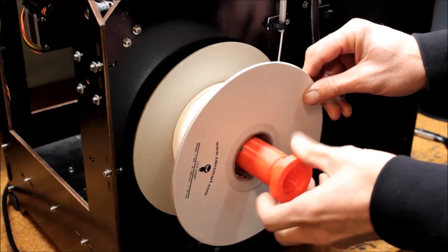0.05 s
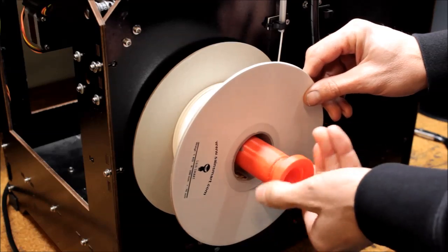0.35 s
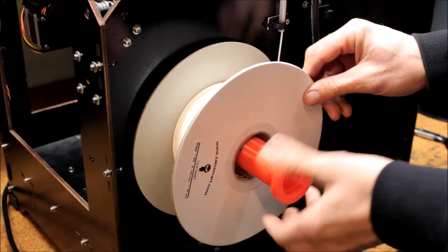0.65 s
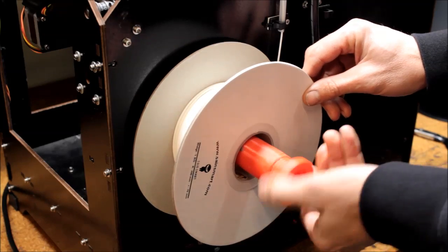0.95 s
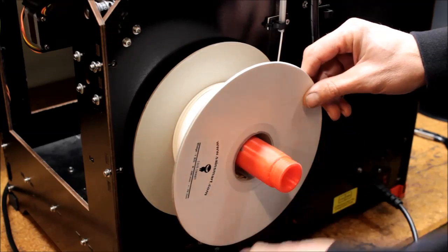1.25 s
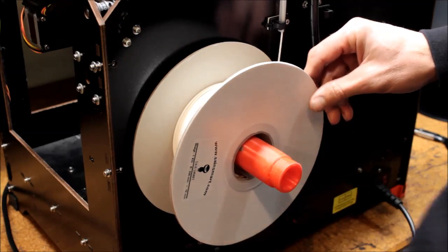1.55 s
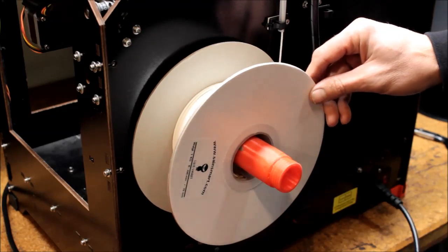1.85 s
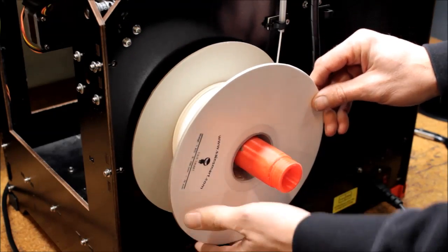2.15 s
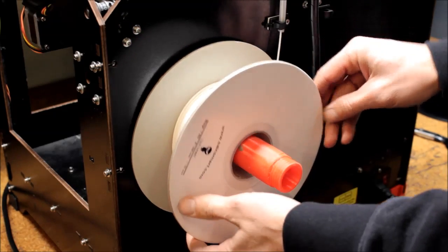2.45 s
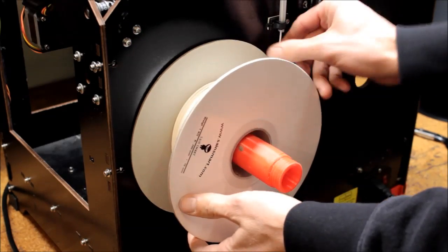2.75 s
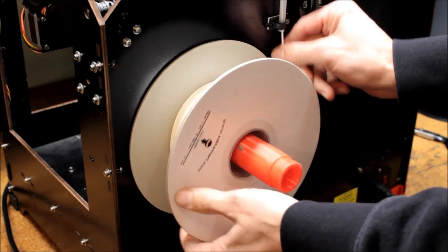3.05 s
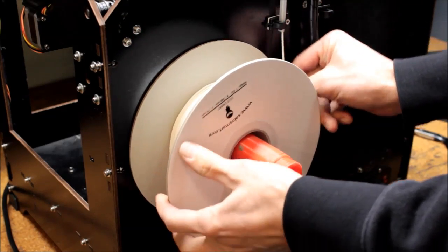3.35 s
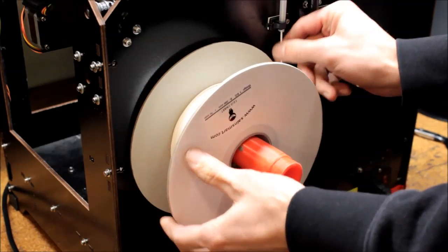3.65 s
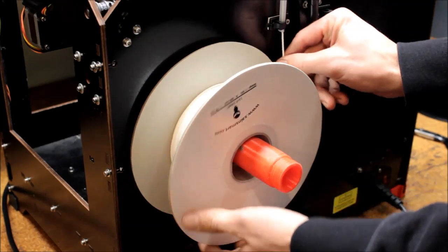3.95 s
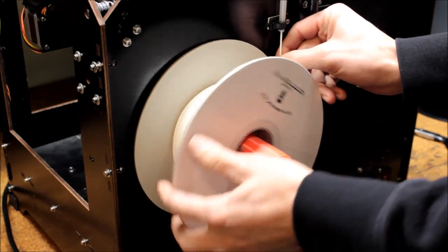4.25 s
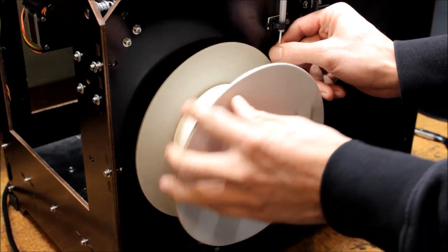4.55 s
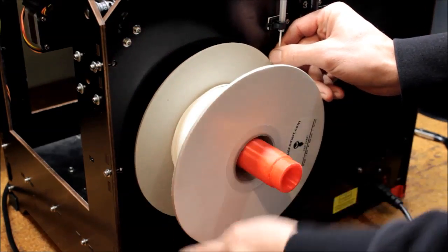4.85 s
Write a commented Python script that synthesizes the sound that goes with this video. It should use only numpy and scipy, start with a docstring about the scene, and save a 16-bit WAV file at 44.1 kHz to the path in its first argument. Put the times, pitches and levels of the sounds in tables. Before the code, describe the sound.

A plastic nut is spun off a spool's axle, knocking and chattering along the thread, then lands on a bench with a short clack. After a bright snap, the plastic spool is shifted and turned by hand, giving hollow knocks, soft rubbing and a few tiny squeaks. The microphone is close, in a small, quiet workshop.

```python
"""Handling a filament spool.

A small, quiet workshop, one microphone close to the bench. A plastic nut is spun off the spool's axle,
knocking and chattering on its thread, and is put down. The spool is shifted and turned by hand: its
flanges boom when it drops against the axle and its hub rubs. Now and then the plastic squeaks and
the taut filament ticks."""
import sys
import numpy as np
from scipy import signal
from scipy.fft import rfft, irfft
from scipy.io import wavfile
from scipy.ndimage import uniform_filter1d

SR = 44100
rng = np.random.default_rng(int(sys.argv[2]) if len(sys.argv) > 2 else 0)


def transcribe(signal):
    """Save signal, clipped to [-1, 1], as a 16-bit WAV file at the path in sys.argv[1]."""
    frames = np.atleast_2d(signal).T
    limited = np.clip(frames, -1, 1)
    pcm = np.round(limited * 32767).astype(np.int16)
    wavfile.write(sys.argv[1], SR, pcm)


N = 225330
TIME = np.arange(N) / SR
RING = 8192  # samples allowed for a body to ring out

# resonances of the spool: pitch_hz, level_db, t60_s
SPOOL_MODES = [(137.3, -15, 0.14), (179.6, -16, 0.3), (231, -18, 0.26), (292.3, -8, 0.11),
               (367.3, -14.5, 0.16), (434, -11.5, 0.076), (579, -15.5, 0.27), (630.7, -0.5, 0.1),
               (930, -9, 0.018), (912, -3.5, 0.055), (978, 9.5, 0.011), (1125, -27, 0.013),
               (1440, -4, 0.018), (1620, -6.5, 0.024), (2490, -29, 0.0092)]


def amp(db):
    """Decibels to gain."""
    return 10 ** (np.asarray(db) / 20)


def unit(x):
    """Scale to an energy of one."""
    return x / np.sqrt(np.sum(x ** 2) + 1e-18)


def level(x, db):
    """Scale to an rms of one, then apply a level or a level curve."""
    return x * amp(db) / np.std(x)


def fade(t, t60):
    """Exponential decay, 60 dB down at t60."""
    return np.exp(-np.log(1000) * t / t60)


def colour(x, points):
    """Minimum-phase filter through (frequency_hz, gain_db) points."""
    hz, db = np.transpose(points)
    bins_hz = np.maximum(np.arange(RING // 2 + 1) * SR / RING, 1)
    gain = amp(np.interp(np.log(bins_hz), np.log(hz), db))
    cepstrum = irfft(np.log(gain))
    cepstrum[1:RING // 2] *= 2
    cepstrum[RING // 2 + 1:] = 0
    response = irfft(np.exp(rfft(cepstrum)))[:RING // 2]
    return signal.oaconvolve(x, response)[:len(x)]


def body(modes, crowd, crowd_db, crowd_t60, treble_t60):
    """Response to one tap: clear modes over a dense crowd of short ones, whose treble dies first."""
    t = np.arange(RING) / SR
    tones = 0
    for k, (hz, db, t60) in enumerate(modes):
        gain = (-1) ** k * amp(db + rng.normal(0, 1))
        pitch_hz = hz * rng.normal(1, 0.0089)
        tones += gain * fade(t, t60) * np.sin(2 * np.pi * pitch_hz * t)
    low = colour(rng.standard_normal(RING), [(2500, 4.5), (8000, 2.4)]) * fade(t, crowd_t60)
    high = colour(rng.standard_normal(RING), [(2500, -13), (8000, 6.5)]) * fade(t, treble_t60)
    return unit(unit(tones) + amp(crowd_db) * unit(colour(low + high, crowd)))


def knocks(rows, modes, crowd, crowd_db, crowd_t60, treble_t60, chatter_db, click_db):
    """Each blow is one contact and a brief chatter of smaller ones, ringing a body."""
    # spectrum of the bare contact: frequency_hz, gain_db
    click_spectrum = [(800, -16), (3000, -1), (6000, 20), (15000, -7)]
    click = amp(click_db) * unit(colour(signal.unit_impulse(RING), click_spectrum))
    out, t = np.zeros(N + RING), np.arange(RING) / SR
    for start_s, db, bass_db, treble_db, chatter_s in rows:
        chatter = rng.standard_normal(RING) ** 3 * np.exp(-t / chatter_s)
        force = signal.unit_impulse(RING) + amp(chatter_db) * unit(chatter)
        response = click + body(modes, crowd, crowd_db, crowd_t60, treble_t60)
        ring = signal.fftconvolve(force, response)[:RING]
        # a soft, heavy contact favours the bass, a hard edge the treble
        ring = colour(ring, [(420, bass_db), (1100, 0.013), (5000, treble_db)])
        start = int(start_s * SR)
        out[start:start + RING] += unit(ring) * amp(db) * np.sqrt(SR / 100)  # energy of 10 ms at db
    return out[:N]


def motion(moves, rise_db_per_s, fall_db_per_s, sag_db_per_s=0):
    """Level curve in dB: each move builds up to its start, lasts, then dies away; the strongest wins."""
    curves = []
    for start_s, length_s, db in moves:
        t = TIME - start_s
        rise = rise_db_per_s * np.maximum(-t, 0)
        sag = sag_db_per_s * np.clip(t, 0, length_s)
        fall = fall_db_per_s * np.maximum(t - length_s, 0)
        curves.append(db - rise - sag - fall)
    return np.max(curves, axis=0)


def slips(per_s, spread_db):
    """Stick and slip: tiny contacts at random moments, their sizes scattered by spread_db."""
    happens = rng.random(N) < per_s / SR
    size = amp(spread_db * np.minimum(rng.exponential(size=N), 4))
    return happens * size * rng.choice([-1, 1], N)


def rub(force, response, db):
    """A train of contacts, following a level curve, rings a body."""
    return signal.oaconvolve(level(force, db), unit(response))[:N]


def walk(per_s):
    """Random values joined by straight lines."""
    count = int(per_s * N / SR) + 2
    return np.interp(TIME * per_s, np.arange(count), rng.standard_normal(count))


def shifting(x, depth_db, per_s):
    """The contact point moves, so each part of the spectrum swells and fades by itself."""
    out = 0
    for edge_hz in (500, 900, 1500, 2500, 4000, 6500, 10000):
        band = signal.sosfilt(signal.butter(1, edge_hz, fs=SR, output="sos"), x)
        out += band * amp(depth_db * walk(per_s))
        x = x - band
    return out + x * amp(depth_db * walk(per_s))


def room_air():
    """The workshop's steady air, a faint, low noise."""
    # spectrum of the air: frequency_hz, gain_db
    spectrum = [(20, 6.5), (32, -35), (46, 7.5), (62, -12), (90, -6), (150, -3), (220, -5), (430, -11),
                (750, -10.5), (1300, -15.5), (2100, -18), (4000, -22), (9000, -28), (15500, -29)]
    return level(colour(rng.standard_normal(N), spectrum), db=-60.47)


def nut_on_thread():
    """Flicked round by the fingers, the loose nut knocks, chatters and scrapes along the thread."""
    # flicks that spin the nut: start_s, length_s, level_db
    flicks = [(0, .004, -58.5), (0.215, 0.038, -45), (0.267, 0.009, -47.5), (.365, 0.12, -51),
              (.91, .065, -44), (1.017, 0.013, -45.5)]
    # knocks on the thread: start_s, level_db, bass_db, treble_db, chatter_s
    hits = [(.1165, -33.5, -12, -0.5, 0.0019), (.119, -28.5, -7.5, 0, 0.0029),
            (.1275, -32, -16, -20, 0.0016), (.174, -46, 8, -12, .0034), (.2035, -38.5, -7, -7, .013),
            (.2225, -39.5, 0, -2, 0.0043), (.412, -50, 6, 7, 0.0077), (.8215, -47.5, -11.5, -29, .001),
            (.8735, -42, -4, -27, .0013), (.8875, -33, -8, -11, 0.0028), (.894, -40, -10, -9, 0.0046),
            (.912, -42, 15, 5, .0036), (1.036, -43.5, 2, 7, 0.0029), (1.0415, -35, -22, -5.5, 0.0034),
            (1.049, -41, 6, 13, .0033)]
    # resonances of the nut on the axle: pitch_hz, level_db, t60_s
    modes = [(346, -5, 0.047), (421, -11, 0.2), (633, 1.5, 0.089), (672, -5.5, 0.15), (750, 0.5, 0.047),
             (930, -13.5, 0.16), (1180, -28, 0.15), (1347, 1.5, 0.032), (1554, -14.5, 0.11),
             (1922, -3, 0.056), (2016, -1.5, 0.049), (2230, -9, 0.051), (2720, -23, 0.076),
             (4240, -13, 0.022)]
    # spectrum of the short-lived modes between them: frequency_hz, gain_db
    crowd = [(90, -23.5), (220, -11.5), (330, -2), (680, -1), (2100, -9), (2700, -15.5), (5500, -24),
             (7500, -45), (15000, -48)]
    blows = knocks(hits, modes, crowd, crowd_db=-7, crowd_t60=0.05, treble_t60=0.02,
                   chatter_db=-7.5, click_db=-42)
    chatter_db = motion(flicks, rise_db_per_s=187, fall_db_per_s=147, sag_db_per_s=39)
    response = body(modes, crowd, crowd_db=-1, crowd_t60=0.026, treble_t60=0.025)
    response *= fade(np.arange(RING) / SR, t60=0.51)  # held against the thread, the nut is damped
    chatter = rub(slips(per_s=630, spread_db=-1.5), response, chatter_db)
    scrape_db = -58.5 + 0.85 * (chatter_db + 45)  # grows a little more slowly than the chatter
    scrape = colour(slips(per_s=5000, spread_db=2),
                    [(1800, -2), (3000, 2.5), (4500, 5.5), (6000, 0.5), (8000, -6), (15000, -15)])
    return blows + chatter + level(scrape, scrape_db)


def squeaks(waver=0.015):
    """For a moment the slipping locks onto one resonance and sings, slightly unsteadily."""
    # squeaks of plastic on plastic: start_s, pitch_hz, level_db, length_s
    notes = [(0.128, 1955, -33, 0.012), (1.04, 1980, -62, 0.0058), (4.168, 3440, -54, 0.021),
             (4.181, 2780, -55, 0.032), (4.24, 6030, -56, .012), (4.246, 3810, -55, 0.026)]
    out = np.zeros(N)
    for start_s, hz, db, length_s in notes:
        start, count = int(start_s * SR), int(length_s * SR)
        wobble = level(uniform_filter1d(rng.standard_normal(count), size=60), db=0)
        phase = 2 * np.pi * np.cumsum(hz * (1 + waver * wobble)) / SR
        out[start:start + count] += level(np.sin(phase) * np.hanning(count), db)
    return out


def filament():
    """Small bright ticks as the taut strand slips."""
    # ticks of the strand: start_s, level_db, bass_db, treble_db, chatter_s
    ticks = [(1.1765, -55.5, 0, -6, .002), (2.525, -51, 0, -32, 0.0032), (4.8712, -52.5, 0, 32, 0.00093)]
    # resonances of the strand: pitch_hz, level_db, t60_s
    modes = [(3840, 1.5, 0.041), (4090, 2.5, 0.029), (5000, -8, 0.085), (5450, -3, 0.019),
             (5960, -11, 0.065), (7030, -9.5, 0.062)]
    # spectrum of its short-lived modes: frequency_hz, gain_db
    crowd = [(300, -51), (2500, -10), (4500, -11), (7000, -34), (9000, 11), (15000, 31)]
    return knocks(ticks, modes, crowd, crowd_db=-20, crowd_t60=0.06, treble_t60=0.015,
                  chatter_db=-12, click_db=-16)


def nut_put_down():
    """The nut lands on the bench and rocks to rest."""
    # landing and bounces: start_s, level_db, bass_db, treble_db, chatter_s
    hits = [(1.615, -41.5, -16, 22, 0.0011), (1.6172, -30.5, -6.5, 5.5, 0.0028),
            (1.6198, -31, -8, 5, 0.0024), (1.642, -39.5, -2, 2, 0.0046), (1.655, -46.5, 2.5, 4, .0016),
            (1.735, -47, 3, 0, .0045)]
    # resonances of the nut on the bench: pitch_hz, level_db, t60_s
    modes = [(594, -4.5, 0.13), (742, -14, .09), (848, -5, 0.12), (975, -33, .14), (1262, 2, 0.062),
             (1344, 7.5, 0.051), (1560, -9, 0.079), (1687, -0.5, 0.056), (2090, -11, .11),
             (2700, -21, 0.12), (4070, -12, 0.025), (9540, -18, 0.026)]
    # spectrum of the short-lived modes between them: frequency_hz, gain_db
    crowd = [(100, -8), (450, 1), (800, 4.5), (1800, -0.5), (4000, -12), (7000, -26), (11000, -58),
             (15000, -43)]
    blows = knocks(hits, modes, crowd, crowd_db=-4.5, crowd_t60=0.099, treble_t60=0.011,
                   chatter_db=-3.5, click_db=-26.5)
    rocking = (1.64, 0.12, -48)  # start_s, length_s, level_db
    rocking_db = motion([rocking], rise_db_per_s=1200, fall_db_per_s=129, sag_db_per_s=19)
    response = body(modes, crowd, crowd_db=4.5, crowd_t60=0.054, treble_t60=0.015)
    # rolling contact is softer than a blow
    response = colour(response, [(300, -1.5), (1300, 2.5), (4000, 0.5), (9000, -7)])
    return blows + rub(slips(per_s=1100, spread_db=2), response, rocking_db)


def spool():
    """The spool knocks on its axle; turning, its hub rubs, its flanges rumble and the hand brushes them."""
    # knocks on the axle: start_s, level_db, bass_db, treble_db, chatter_s
    hits = [(2.0975, -45.5, -18, -7.5, .0013), (2.2085, -57.5, -20, -30, .0013),
            (2.530, -39.5, 15, -3, 0.0037), (2.575, -36, 3.5, -8, 0.01), (2.592, -42.5, 8, -15, 0.0053),
            (2.687, -52.5, 0, -6, 0.003), (2.7685, -40, 3, 0, 0.0011), (3.613, -47, -25, 12, 0.002),
            (3.6195, -31, -7.5, -1.5, 0.00038), (3.627, -35.5, 7, -1, 0.007), (3.655, -40, 10.5, 1, 0.015),
            (3.706, -47, 16, -23, .003), (3.712, -40, 15.5, -30, 0.0044), (4.152, -44, 7, 2, 0.0012),
            (4.336, -46.5, 4, 18, 0.0012), (4.598, -44, 21, 4, .0044), (4.608, -48, 5, 12.5, .01),
            (4.727, -47.5, 14.5, 0, .00065)]
    # spectrum of the spool's short-lived modes: frequency_hz, gain_db
    crowd = [(70, -29.5), (140, -7), (350, -5), (600, -2), (1000, 0), (2000, -7), (4000, -12), (6000, -25),
             (9000, -27.5), (15000, -34)]
    blows = knocks(hits, SPOOL_MODES, crowd, crowd_db=-0.5, crowd_t60=0.068, treble_t60=0.029,
                   chatter_db=-9, click_db=-21.5)

    # pushes that turn the spool at a steady speed: start_s, length_s, level_db
    pushes = [(1.958, 0.034, -59), (2.091, 0.012, -56.5), (2.338, 0.037, -57), (2.569, 0.005, -47),
              (2.838, .04, -62), (3.062, .06, -59.5), (3.137, .24, -54), (3.477, 0.016, -55.5),
              (3.745, 0.015, -54), (3.851, 0.045, -57.5), (4.093, .04, -56), (4.164, .035, -47),
              (4.25, 0.18, -53), (4.491, 0.036, -49.5), (4.593, 0.034, -49)]
    # spectrum of the hub's friction: frequency_hz, gain_db
    hub_spectrum = [(300, -19.5), (480, -9.5), (680, -6.5), (850, -6), (1050, 0), (1500, -3.5),
                    (2000, -5.5), (2500, -8), (4000, -9), (5500, -21), (8000, -41.5), (15000, -47)]
    hub_db = motion(pushes, rise_db_per_s=295, fall_db_per_s=175)
    friction = colour(slips(per_s=6000, spread_db=2.5), hub_spectrum)
    hub = level(shifting(friction, depth_db=1.8, per_s=40), hub_db)
    # the rubbing also sings in the spool's own modes
    contacts = slips(per_s=2500, spread_db=0)
    response = body(SPOOL_MODES, crowd, crowd_db=-2.5, crowd_t60=0.048, treble_t60=0.012)
    singing = rub(contacts, response, hub_db - 6.5)

    # the hand sliding over a flange: start_s, length_s, level_db
    brushes = [(3.165, 0.2, -59), (3.45, 0.046, -59.5), (3.758, 0.0067, -61), (3.85, 0.025, -64),
               (4.102, .04, -63.5), (4.196, 0.054, -49.5), (4.312, 0.037, -53.5), (4.377, 0.29, -61),
               (5.05, .06, -68)]
    # spectrum of skin on plastic: frequency_hz, gain_db
    skin_spectrum = [(1500, -65), (4000, 13), (7000, 9), (10000, 3), (15000, 0.5)]
    skin_db = motion(brushes, rise_db_per_s=174, fall_db_per_s=165, sag_db_per_s=6)
    hiss = colour(slips(per_s=9000, spread_db=3.5), skin_spectrum)
    skin = level(shifting(hiss, depth_db=2.5, per_s=50), skin_db)

    # jolts that set the flanges shuddering: start_s, level_db
    jolts = [(0.204, -54), (1.035, -59.5), (2.207, -66), (2.531, -41), (3.762, -55.5), (4.3, -49.5),
             (4.364, -45.5), (4.605, -48), (4.742, -53), (5.048, -50)]
    shudder_db = motion([(s, 0, db) for s, db in jolts], rise_db_per_s=900, fall_db_per_s=138)
    rumble_db = np.maximum(hub_db - 11.5, shudder_db)
    flanges = body(SPOOL_MODES, crowd, crowd_db=1.5, crowd_t60=0.073, treble_t60=0.025)
    flanges = colour(flanges, [(70, -10.5), (135, 0), (190, -8), (400, -19), (800, -28.5), (2000, -34)])
    rumble = rub(slips(per_s=1500, spread_db=-0.5), flanges, rumble_db)
    return blows + hub + singing + skin + rumble


def snap():
    """One hard, bright snap as the filament strikes the spool's flange."""
    # the snap's two contacts: start_s, level_db, bass_db, treble_db, chatter_s
    hits = [(2.386, -36.5, 0, 3, 0.0029), (2.398, -42, 0, -14, 0.004)]
    # spectrum of the short-lived modes it rings: frequency_hz, gain_db
    crowd = [(100, -8), (700, 4), (2000, 2.5), (4000, 0.5), (6200, 1), (8000, -20), (15000, -19)]
    return knocks(hits, SPOOL_MODES, crowd, crowd_db=20, crowd_t60=0.094, treble_t60=0.041,
                  chatter_db=-2, click_db=-13)


def room(x, wet_db, low_t60, high_t60):
    """Nearby walls return a short tail that dulls as it fades."""
    t = np.arange(2 * RING) / SR
    low = colour(rng.standard_normal(len(t)), [(2000, -2.5), (7000, -7)]) * fade(t, low_t60)
    high = colour(rng.standard_normal(len(t)), [(2000, -37), (7000, -20)]) * fade(t, high_t60)
    onset = np.clip(t / 0.014, 0, 1) ** 2
    tail = unit((low + high) * onset)
    return x + amp(wet_db) * signal.oaconvolve(x, tail)[:N]


def scene():
    """The handling at the close microphone, in mono: mostly direct sound, a little of the room."""
    handling = nut_on_thread() + nut_put_down() + spool() + snap() + squeaks() + filament()
    return (room(handling, wet_db=-14, low_t60=0.52, high_t60=0.1) + room_air())[None]


def record(dry):
    """The recorder cuts the top treble steeply."""
    top_hz = 15800
    return signal.sosfilt(signal.ellip(10, 0.1, 70, top_hz, fs=SR, output="sos"), dry)


dry = scene()
out = record(dry)
transcribe(out)
```